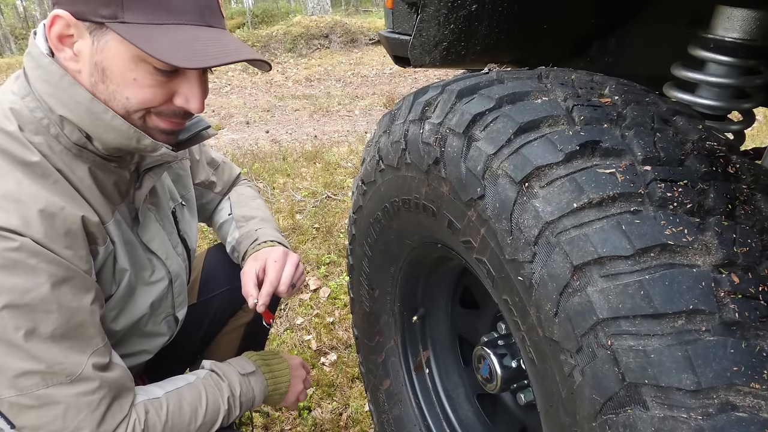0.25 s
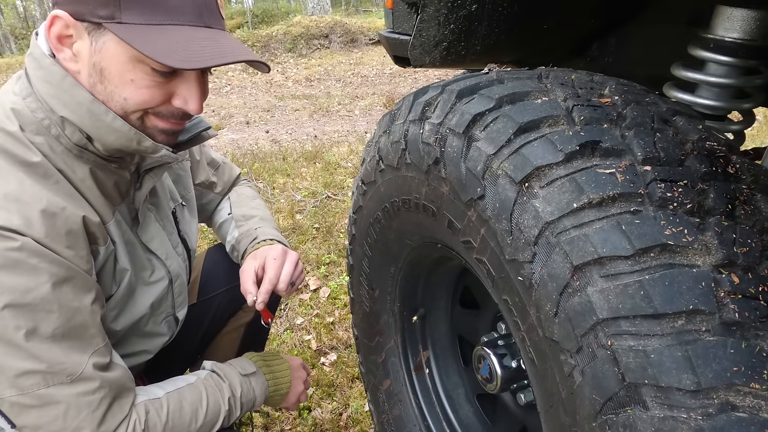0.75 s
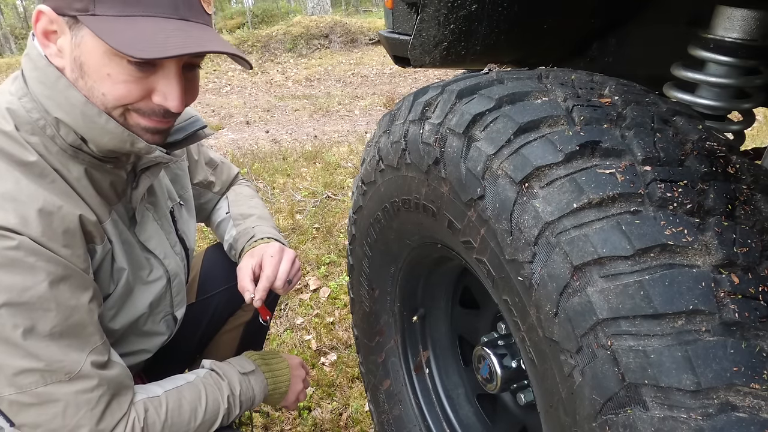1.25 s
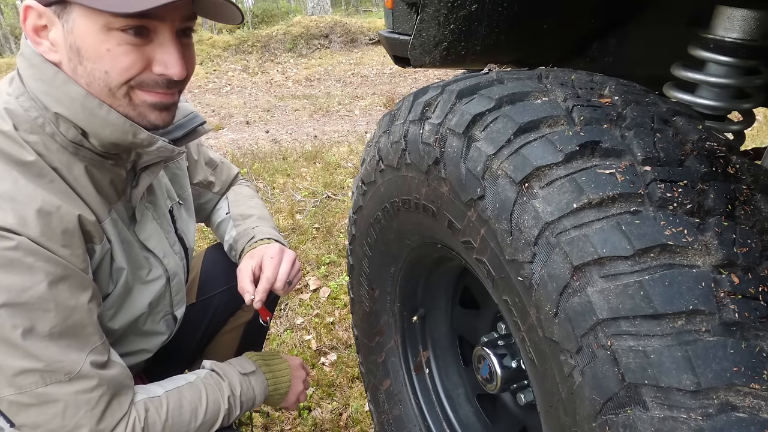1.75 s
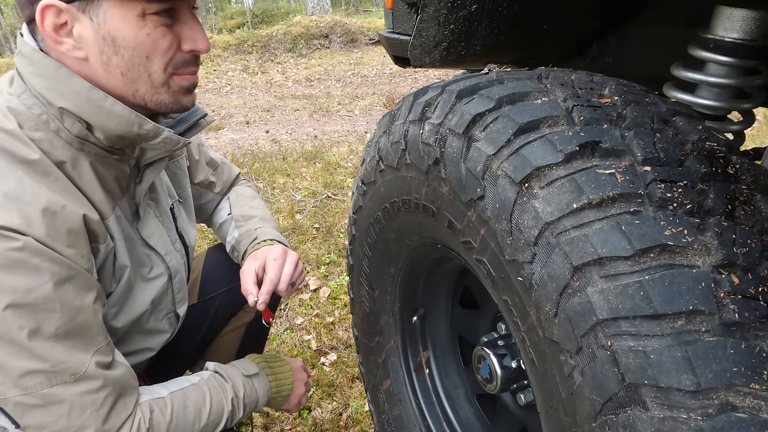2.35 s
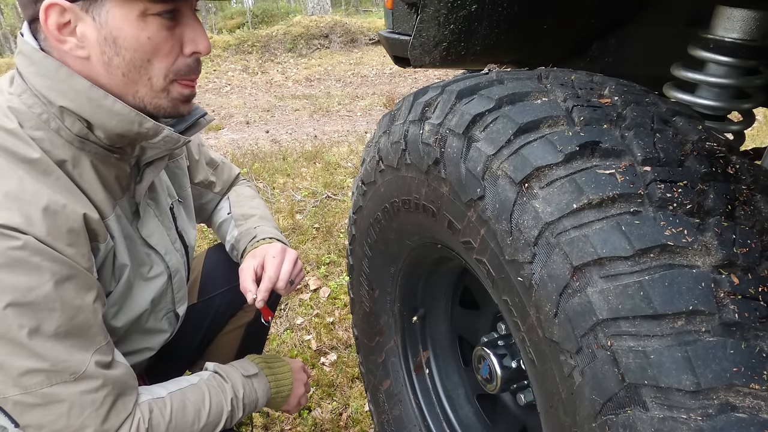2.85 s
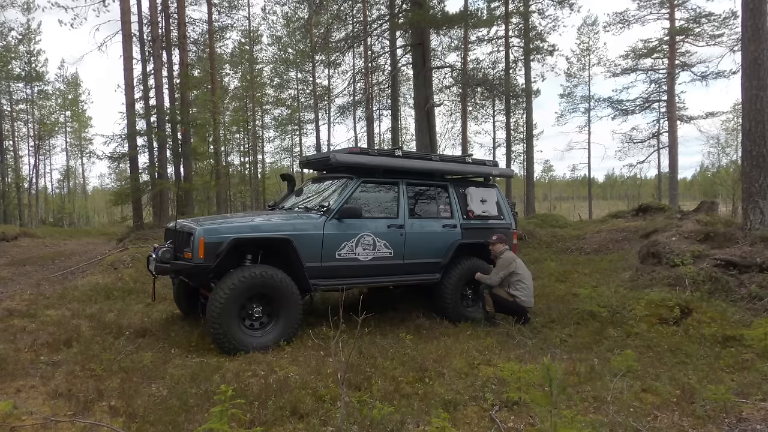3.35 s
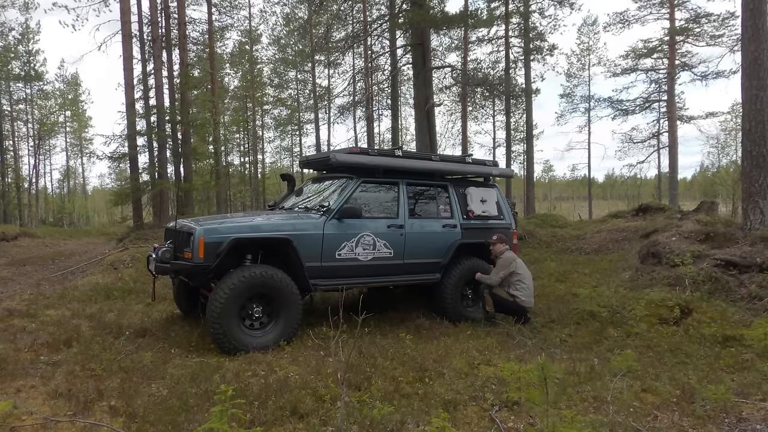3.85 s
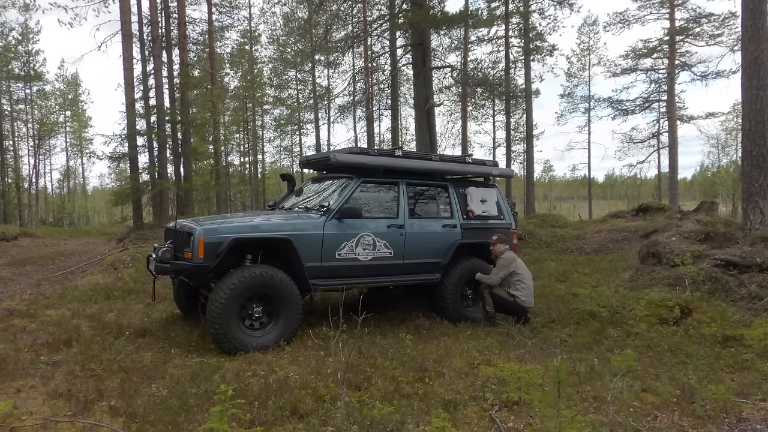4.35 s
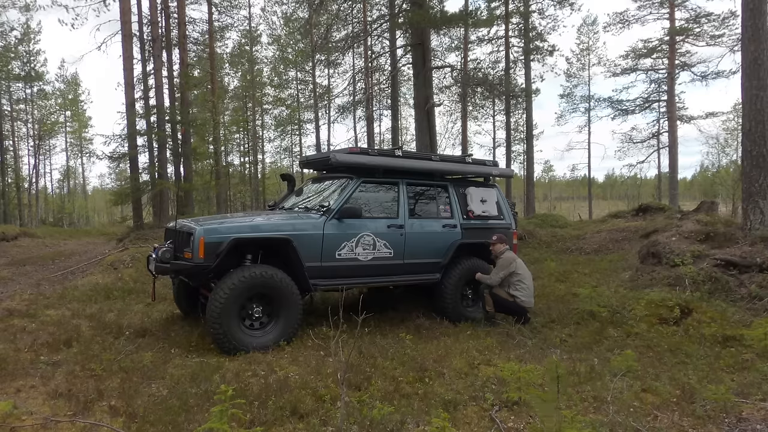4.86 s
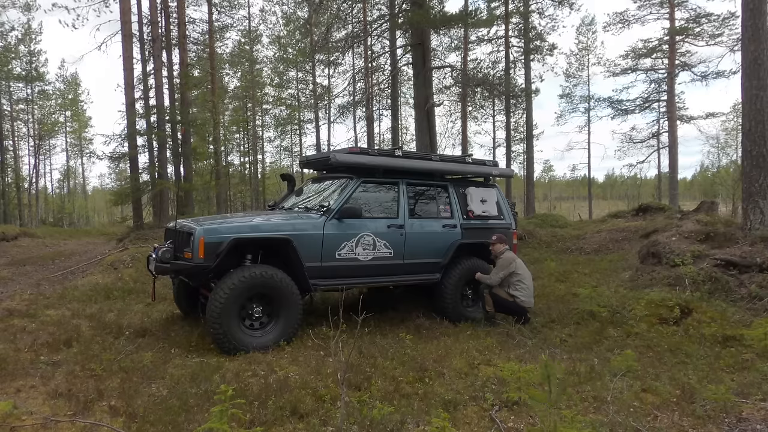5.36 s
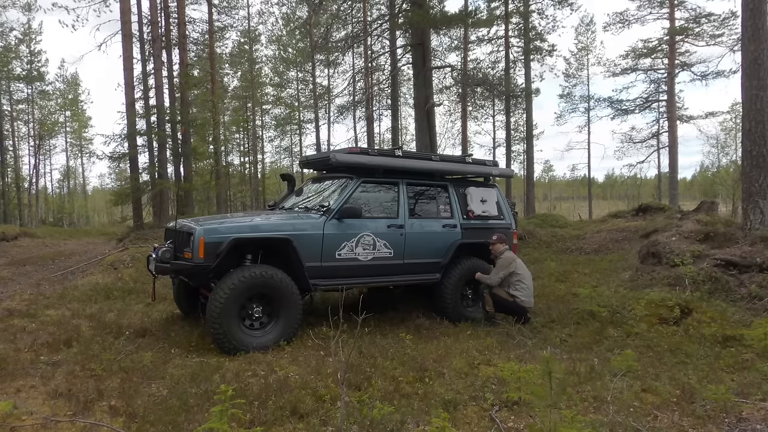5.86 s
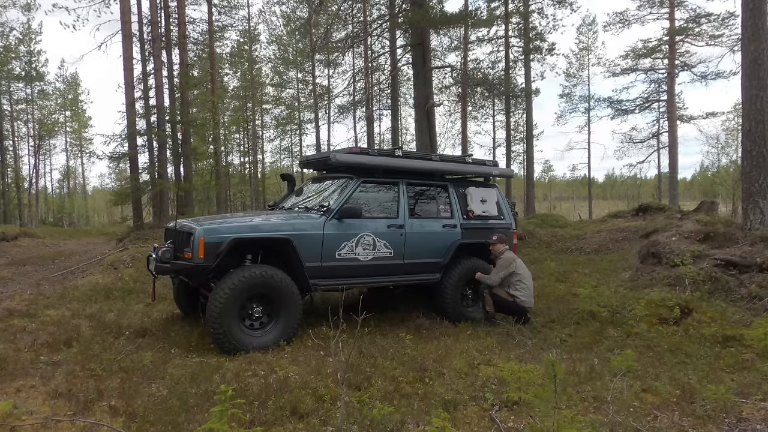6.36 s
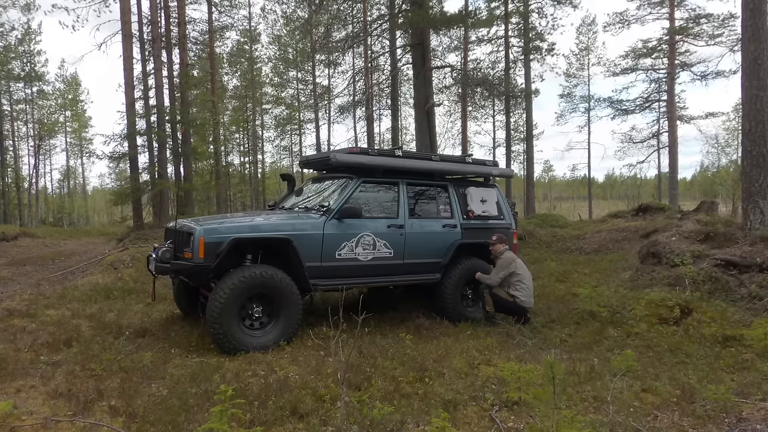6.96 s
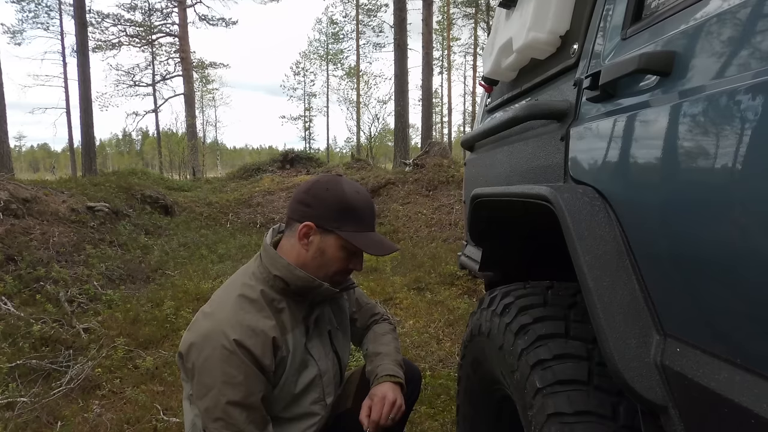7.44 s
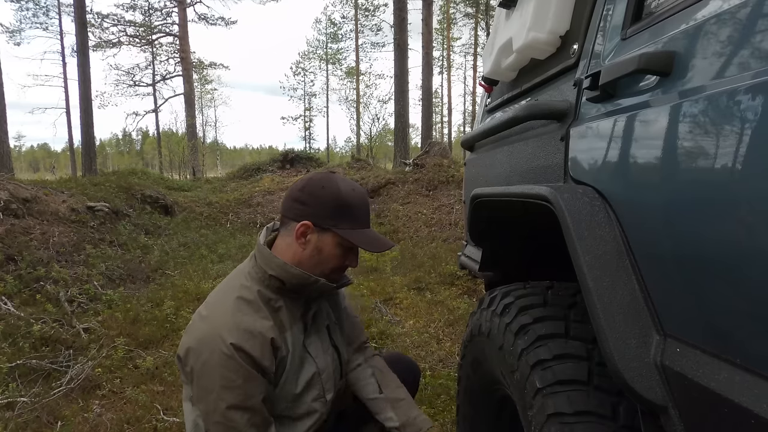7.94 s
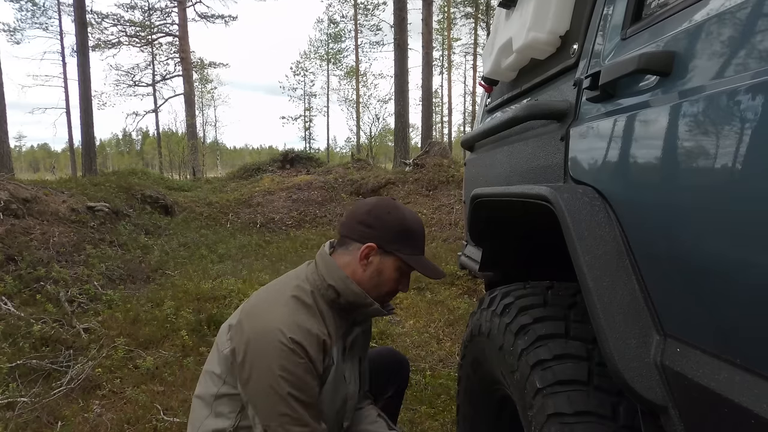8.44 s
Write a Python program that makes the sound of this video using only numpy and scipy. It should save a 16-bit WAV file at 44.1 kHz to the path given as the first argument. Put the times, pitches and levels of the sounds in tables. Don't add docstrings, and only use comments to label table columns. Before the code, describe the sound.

Pressurised air rushes from an open tyre valve in a forest, a steady, bright, turbulent hiss without pauses. Heard close at first with soft low wind puffs, then slightly duller and more distant under strong rumbling gusts on the bare microphone, then close again. At the end a hand moves into the jet, and a coarse roaring band swells and climbs over the hiss.

```python
import sys
import numpy as np
from scipy import signal
from scipy.fft import rfft, irfft, next_fast_len
from scipy.io import wavfile
from scipy.ndimage import uniform_filter1d, map_coordinates

SR = 44100
rng = np.random.default_rng(int(sys.argv[2]) if len(sys.argv) > 2 else 0)


def gain_from_decibels(decibels):
    exponent = np.asarray(decibels, float) / 20
    return 10 ** exponent


def int16_out(signal):
    q = np.round(np.clip(np.atleast_2d(signal).T, -1, 1) * 32767)
    wavfile.write(sys.argv[1], SR, q.astype(np.int16))


N = 383669
TOP_HZ = 15740


def unit(x):
    return x / np.sqrt(np.mean(x ** 2) + 1e-20)


def along(points, hz):
    f, v = np.transpose(points)
    return np.interp(np.log(hz + 1), np.log(f + 1), v)


def curves(rows):
    s, *cols = np.transpose(rows)
    return [np.interp(np.arange(N) / SR, s, c) for c in cols]


def wobble(rate_hz):
    knots = rng.standard_normal(int(N * rate_hz / SR) + 4)
    return map_coordinates(knots, [np.arange(N) * rate_hz / SR])


def bumps(rows):
    t = np.arange(N) / SR
    return sum(height * np.exp(-((t - s) / length_s) ** 2) for s, height, length_s in rows)


def filtered(x, response):
    m = next_fast_len(N + 8192)
    return irfft(rfft(x, m) * response(np.fft.rfftfreq(m, 1 / SR)), m)[..., :N]


def turbulence(patchy_db):
    z = signal.stft(rng.standard_normal(N), nperseg=512)[2]
    field = uniform_filter1d(rng.standard_normal(z.shape), size=16, axis=0)
    field = uniform_filter1d(field, size=8, axis=1)
    return signal.istft(z * gain_from_decibels(patchy_db * unit(field)), nperseg=512)[1][:N]


def eddies(spectrum, even):
    x = filtered(rng.standard_normal(N), lambda hz: gain_from_decibels(along(spectrum, hz)))
    swell = uniform_filter1d(uniform_filter1d(x ** 2, size=2400), size=2400)
    swell = np.abs(swell) + 1e-12
    return unit(x / swell ** (even / 2))


def puffs():
    # start_s, peak_db
    puff_rows = [(.264, -49), (.638, -39), (.697, -43), (.793, -38), (.87, -47), (1.185, -45), (1.291, -42),
                 (1.704, -42), (1.734, -28), (1.766, -28), (1.82, -27), (1.856, -36), (1.892, -28),
                 (1.931, -36), (1.958, -36), (1.98, -34), (2.124, -44), (2.235, -39.5), (2.262, -35),
                 (2.3, -31), (2.346, -27), (2.394, -36), (2.538, -41), (2.569, -32), (2.624, -32),
                 (2.651, -35), (2.673, -39), (2.718, -45)]
    # start_s, level_db
    stir = [
        (0, -65),
        (1.6, -62),
        (2, -54),
        (2.9, -61),
    ]
    # freq_hz, density_db
    thump = [(12, -25), (22, 5), (48, 0), (97, -10), (150, -14), (210, -19), (400, -80)]
    out = np.zeros(N)
    t = np.arange(-SR // 20, SR // 20) / SR
    for (s, db), (pitch, way) in zip(puff_rows, rng.standard_normal((len(puff_rows), 2))):
        turn = t * 70 * np.exp(0.2 * pitch)
        swing = np.exp(-(turn / 0.36) ** 2) * np.cos(2 * np.pi * turn)
        out[round(s * SR) - SR // 20:][:len(t)] += gain_from_decibels(db) * np.sign(way) * swing
    draught_db, draught_s = -14.5, 0.029
    draught = bumps([(s, gain_from_decibels(db + draught_db), draught_s) for s, db in puff_rows])
    stir_db, = curves(stir)
    sheltered = np.arange(N) / SR < stir[-1][0]
    return out + (sheltered * gain_from_decibels(stir_db) + draught) * eddies(thump, even=0.6)


def wind():
    # start_s, buffet_db, sharpness_db (flutter re buffet)
    gusts = [(2.8, -66.5, -6), (2.9, -44, -6), (3.03, -26.5, -9), (3.35, -26, -2), (3.7, -25, -6.5),
             (4.45, -29, -8), (4.68, -25.5, -9), (5.3, -30, -8.5), (5.85, -27, -9), (6.0, -30, -22),
             (6.22, -34, -19), (6.3, -29, -7.5), (7.13, -33.5, -12), (7.24, -24, -3.5), (7.7, -23.5, -3),
             (8.1, -24.5, -11.5), (8.35, -19.5, -4), (8.7, -26.5, -7)]
    # start_s, change_db
    surges = [(3.41, -13), (3.57, 4), (3.82, -8), (3.9, 2), (4.19, -4), (4.25, 4), (4.53, -8), (4.64, 4),
              (5.03, 5), (5.13, -4), (5.32, -9), (5.58, -2.5), (5.75, 7), (5.82, -2), (5.88, 10),
              (5.93, -6), (6.13, -4), (6.3, 9), (6.44, -6), (6.98, -9), (7.27, 5), (7.39, 6.5), (7.5, -3),
              (7.78, 4), (7.85, -10), (7.93, 5), (7.97, -3), (8.02, 4), (8.2, -3), (8.63, 1)]
    # freq_hz, density_db
    buffet = [(12, -33), (22, -10), (50, 1.5), (80, 1.5), (110, 0), (140, -7.5), (200, -24), (400, -80)]
    # freq_hz, density_db
    flutter = [(60, -63), (110, -4.5), (150, 2.5), (255, -10.5), (340, -19), (500, -32.5), (1000, -72)]
    surge_s, flutter_follows = 0.026, 0.38
    buffet_db, sharp_db = curves(gusts)
    surge_db = bumps([(s, db, surge_s) for s, db in surges])
    exposed = np.arange(N) / SR > gusts[0][0]
    lumps = wobble(22)
    low = gain_from_decibels(surge_db) * unit(gain_from_decibels(1.25 * lumps) * eddies(buffet, even=0.85))
    flutter_db = sharp_db + flutter_follows * surge_db + 1.9 * lumps + 1.65 * wobble(9)
    high = gain_from_decibels(flutter_db) * eddies(flutter, even=0.96)
    return exposed * gain_from_decibels(buffet_db) * (low + high)


def hand():
    # start_s, low_edge_hz, high_edge_hz, level_db
    strike = [
        (8.15, 450, 800, -56),
        (8.3, 550, 1000, -40.5),
        (8.37, 740, 1500, -37),
        (8.42, 1180, 2200, -27.5),
        (8.48, 1270, 3000, -24),
        (8.54, 1390, 4300, -22),
        (8.6, 1540, 5570, -20),
        (8.7, 1850, 6300, -21.5),
    ]
    hz, t, z = signal.stft(turbulence(patchy_db=0.9), SR, nperseg=512)
    hz = hz[:, None]
    s, low_hz, high_hz, db = np.transpose(strike)
    low, high = np.interp(t, s, low_hz), np.interp(t, s, high_hz)
    band = 1 / np.sqrt((1 + (low / (hz + 1)) ** 4.4) * (1 + (hz / high) ** 4.5))
    band = band * (1 + 0.5 * np.exp(-(np.log(hz / low + 1e-9) - 0.3) ** 2 / 0.08))
    band = band * (1 + 0.47 * np.exp(-np.log(hz / high + 1e-9) ** 2 / 0.025))
    band = band / np.sqrt(np.mean(band ** 2, axis=0))
    level = gain_from_decibels(np.interp(t, s, db, left=-120))
    return signal.istft(z * band * level, SR, nperseg=512)[1][:N]


def jet():
    # fade_start_s, fade_end_s, body_db, treble_db
    places = [
        (-.1, 0, -27, -23),
        (2.92, 3.047, -27.5, -26.5),
        (7.143, 7.272, -27.5, -24),
        (8.407, 8.537, -27, -26.8),
    ]
    # start_s, depth_db, length_s
    fades = [
        (3.4, -0.1, .2),
        (4.6, -1, 0.13),
        (6.2, -2.5, 0.11),
        (6.68, -2.5, 0.17),
        (7.05, -1, .3),
    ]
    # freq_hz, density_db
    jet_near = [(300, -22.2), (600, -18.3), (1000, -11.7), (2000, -6.0), (4000, -0.6), (6500, -4.8),
                (9500, 0.0), (12500, -3.8), (15600, -5.4)]
    jet_far = [(600, -11.3), (1000, -7.5), (2000, -4.5), (4000, 0.0), (6500, -2.6), (9500, -2.3),
               (12500, -3.2), (15600, -5.7)]
    jet_side = [(600, -11.7), (1000, -11.6), (2000, -6.8), (4000, -1.3), (6500, 0.0), (9500, -2.3),
                (12500, -0.4), (15600, -9.3)]
    jet_shaded = [(600, -14), (1000, -10), (2000, -19), (4000, -0.5), (6500, 4), (9500, 3), (12500, 0),
                  (15600, -2.5)]
    # centre_hz, width_hz, gain_db
    echo_near = [(1750, 260, -2.2), (2740, 260, -4.4), (3040, 180, -1.4), (3550, 180, -2.8),
                 (4420, 120, -1.9), (5080, 180, 1.5), (5410, 180, -3.3), (5890, 180, 1.9),
                 (6520, 260, -2.0), (6880, 120, 3.4), (7240, 180, -2.4), (8170, 120, 1.7), (8650, 120, 2.1),
                 (10390, 260, -2.7), (11800, 380, 2.2), (12250, 120, -2.3), (12640, 180, 1.1),
                 (12940, 120, 4.0), (13240, 120, -2.0), (13480, 120, -1.6), (14050, 260, 3.9),
                 (15160, 120, -3.1)]
    echo_far = [(1120, 120, 2.7), (1780, 180, 1.9), (2380, 120, 3.6), (2740, 260, -1.7), (3580, 120, 2.5),
                (4000, 260, 5.1), (4300, 120, 3.1), (4480, 120, -2.2), (4690, 180, 1.9), (5170, 120, -3.2),
                (5800, 180, 2.5), (6610, 120, 1.8), (7420, 260, 2.0), (7900, 120, -1.6), (8290, 180, 4.2),
                (8710, 120, 3.1), (8860, 120, -2.1), (9130, 120, 5.7), (9880, 120, -1.7),
                (10180, 120, -3.0), (10510, 120, -4.6), (10900, 120, -4.3), (12190, 180, -2.5),
                (13120, 120, 2.0), (13330, 120, -2.6), (13720, 380, -1.5), (14260, 260, 1.1),
                (15490, 120, 3.0)]
    echo_side = [(2110, 180, 2.3), (3070, 550, -3.1), (4510, 180, -2.4), (4930, 180, 2.3),
                 (5380, 180, -1.5), (7150, 380, -4.9), (7690, 260, 2.8), (8590, 260, 2.9),
                 (9790, 260, -2.7), (10330, 550, -8.1), (10870, 180, -2.2), (11470, 260, 3.1),
                 (12190, 180, 2.0), (13000, 180, -2.0), (13450, 800, -4.7), (14590, 260, -1.8)]
    echo_shaded = [(7500, 500, 5), (10500, 640, -3), (11400, 600, 2)]
    colours = [(jet_near, echo_near), (jet_far, echo_far), (jet_side, echo_side), (jet_shaded, echo_shaded)]
    t = np.arange(N) / SR
    arrive = [np.clip((t - start) / (end - start), 0, 1) for start, end, *_ in places] + [0 * t]
    waver_db = bumps(fades) + 0.2 * wobble(5.6)
    body_share = lambda hz: 1 / (1 + (hz / 6000) ** 12)
    total = np.zeros(N)
    for k, (shape, echoes) in enumerate(colours):
        ripple = lambda hz: sum(db * np.exp(-2 * ((hz - mid) / width) ** 2) for mid, width, db in echoes)
        colour = lambda hz: gain_from_decibels(along(shape, hz) + 1.09 * ripple(hz)) * (hz < TOP_HZ)
        air = filtered(turbulence(patchy_db=0.36), colour)
        body = filtered(air, body_share)
        body_db = places[k][2] + 0.35 * waver_db + 0.16 * wobble(7.1)
        treble_db = places[k][3] + waver_db + 0.35 * wobble(12)
        heard = gain_from_decibels(body_db) * unit(body) + gain_from_decibels(treble_db) * unit(air - body)
        total += np.sqrt(arrive[k] * (1 - arrive[k + 1])) * heard
    return total


def scene():
    return np.tile(jet() + hand() + wind() + puffs(), (2, 1))


def unlike(mid):
    # start_s, length_s
    split = [(.06, .6), (1.11, .05), (1.52, .35), (2.01, .32), (2.48, .46), (3.01, 1.13), (4.2, .06),
             (4.33, .19), (4.57, .06), (4.73, .11), (5.22, .03), (5.47, .28), (5.91, .37), (6.77, .09),
             (7.07, .05), (7.33, .03), (7.82, .3), (8.28, .14)]
    # freq_hz, level_db
    rounding = [(50, -32), (200, -29), (500, -17.5), (2000, -16.5), (15000, -17)]
    # freq_hz, factor
    ready = [(100, 1.1), (900, 1.4), (1600, .85), (7000, .9), (10000, 1.25)]
    frame, grid, band = 1024, 87, 16
    n, k = np.arange(2 * frame), np.arange(46 * band)
    window = np.sin(np.pi * (n[:, None] + 0.5) / (2 * frame))
    basis = window * np.cos(np.pi / frame * np.outer(n + 0.5 + frame / 2, k + 0.5))
    starts = np.arange(grid, N - 2 * frame, frame)
    lines = mid[starts[:, None] + n] @ basis
    size = np.sqrt(np.mean(lines.reshape(len(starts), -1, band) ** 2, axis=2))
    s = (starts + frame) / SR
    hz = (np.arange(size.shape[1]) + 0.5) * band * SR / (2 * frame)

    share = np.zeros(len(s))
    for start, length in split:
        share += (s >= start) * (s <= start + length) * np.maximum(0.92 - 1.3 * (s - start), 0.5)
    luck = rng.random(size.shape)
    luck[:, 9::2] = luck[:, 8:-1:2]
    stray = 0.07 * (hz < 1200)
    differs = luck < share[:, None] * along(ready, hz) + stray
    gain = differs * gain_from_decibels(along(rounding, hz) + 1.2 * rng.standard_normal(size.shape))

    for when, where in rng.random((31, 2)):
        centre_hz = 4800 + where * (15000 - 4800)
        gain[int(when * len(s)), np.abs(hz / centre_hz - 1) < 0.13 / 2] = 1
    noise = np.repeat(size * gain, band, axis=1) * rng.standard_normal(lines.shape)
    frames = noise @ basis.T * 2 / frame
    return np.bincount((starts[:, None] + n).ravel(), frames.ravel(), N)


def low_pass(x):
    return signal.sosfilt(signal.butter(12, 17080, fs=SR, output="sos"), x)


def record(dry):
    mid = filtered(dry[0], lambda hz: hz < TOP_HZ)
    side = unlike(mid)
    return low_pass(np.array([mid + side, mid - side]))


dry = scene()
out = record(dry)
int16_out(out)
```